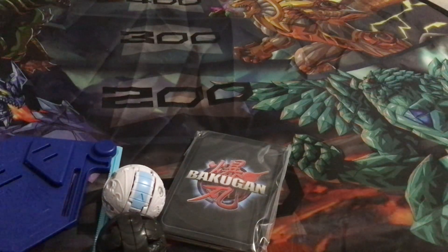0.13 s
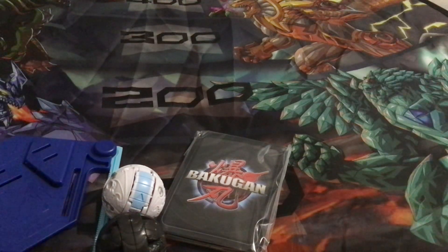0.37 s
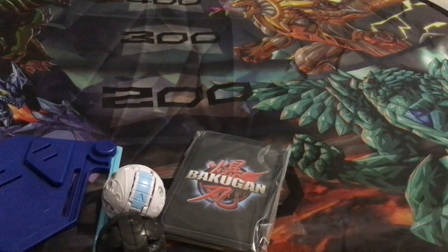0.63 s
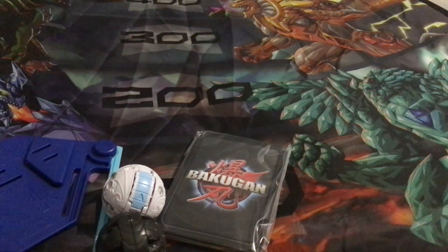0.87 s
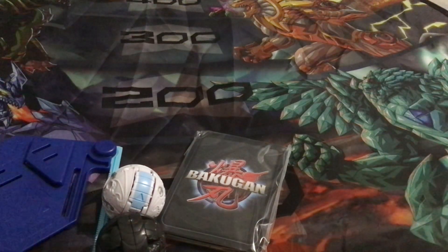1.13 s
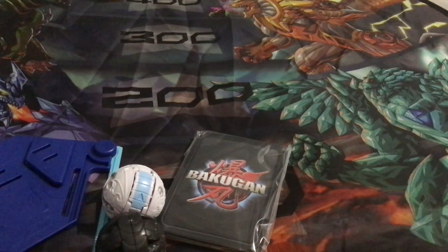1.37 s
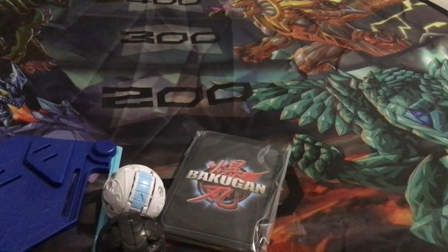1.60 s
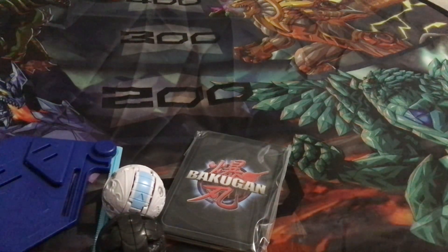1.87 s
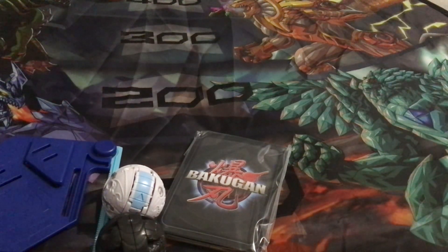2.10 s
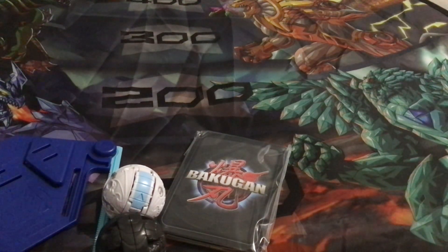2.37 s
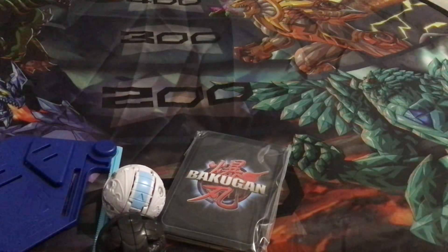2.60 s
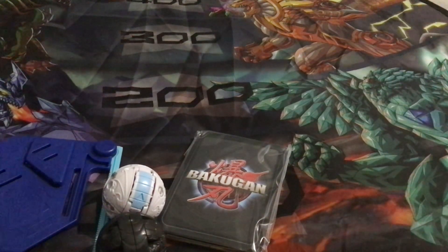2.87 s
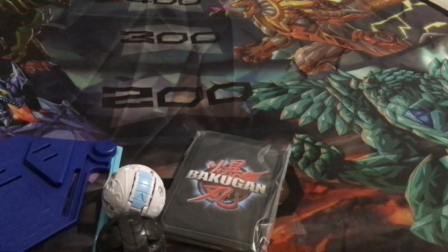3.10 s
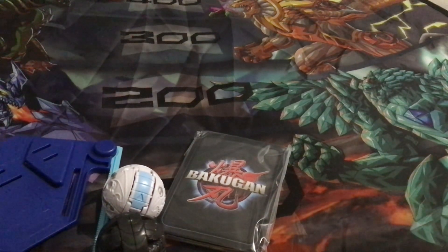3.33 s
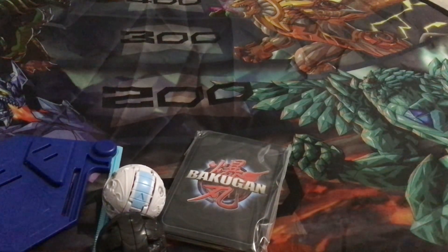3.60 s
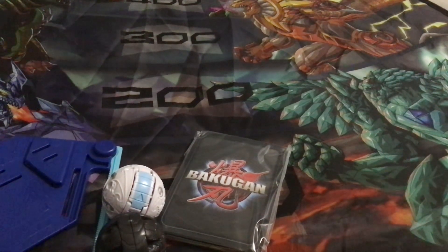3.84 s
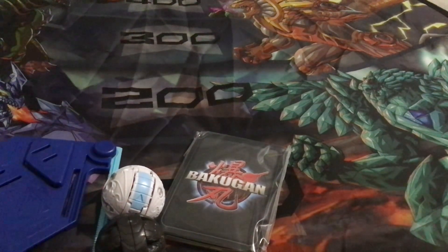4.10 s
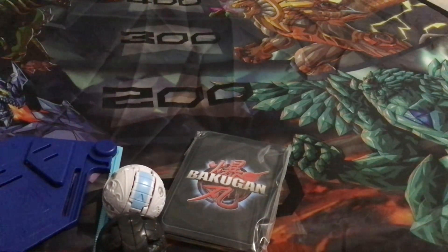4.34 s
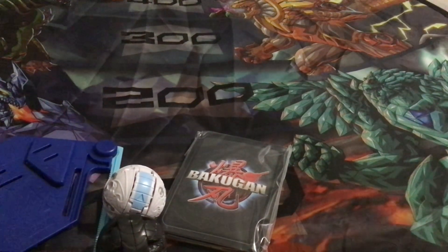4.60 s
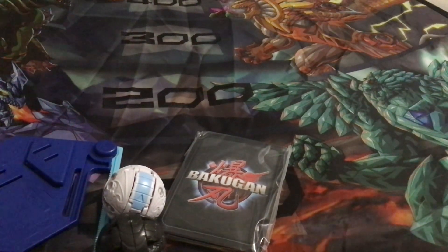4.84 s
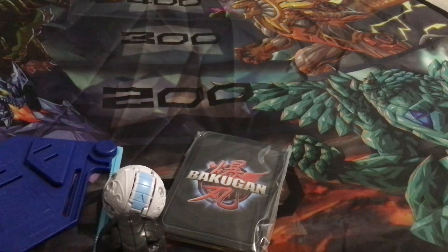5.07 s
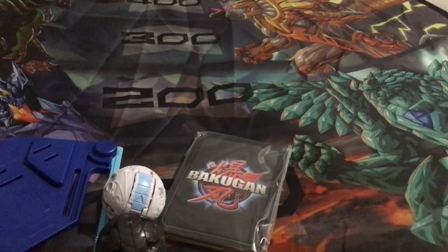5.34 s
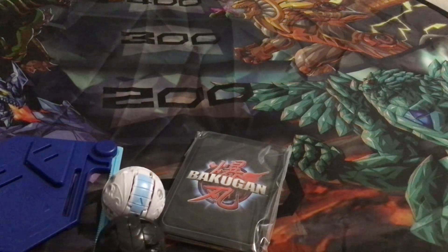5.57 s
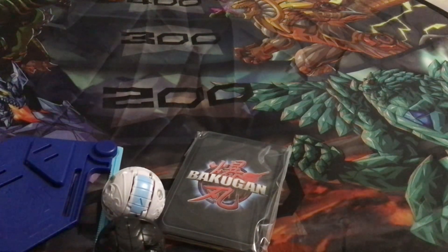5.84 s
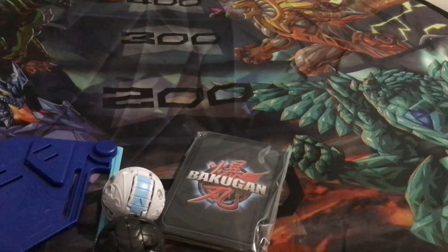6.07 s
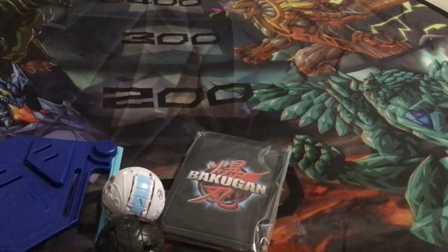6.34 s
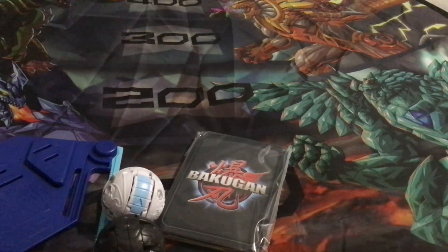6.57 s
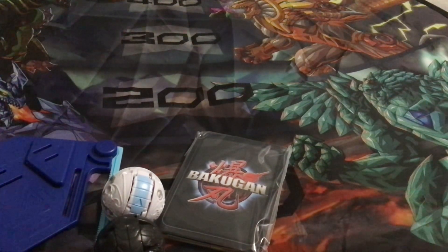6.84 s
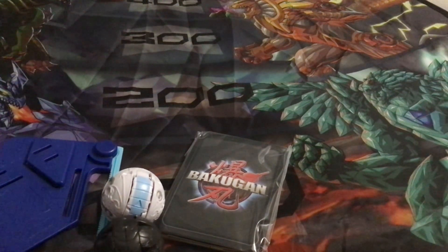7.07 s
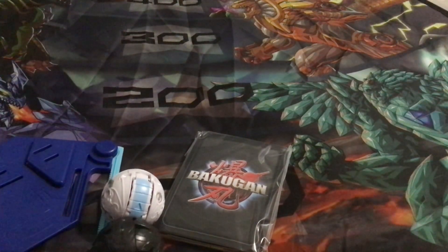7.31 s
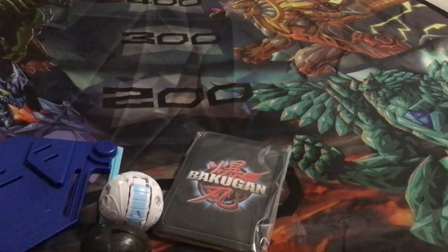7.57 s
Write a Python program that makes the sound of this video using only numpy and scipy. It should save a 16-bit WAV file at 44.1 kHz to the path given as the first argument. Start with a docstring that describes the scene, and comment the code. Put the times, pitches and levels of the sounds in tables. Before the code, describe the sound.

Small hard plastic pieces click, clack and knock on a table close by, with brief rubs and creaks over faint room hum.

```python
"""Small hard plastic pieces are turned over and set down on a table close to a microphone in a quiet room.
Each contact is a noise-burst crack, a short ring of the shells and a knock in the table top, from decaying modes.
Between contacts, trains of small slips rub, shuffle and creak; a thin faint tone swells once.
Sparse echoes give a short room tail, over coloured noise for the room air."""
import sys
import numpy as np
from scipy import signal
from scipy.io import wavfile
from scipy.ndimage import uniform_filter1d

SR = 44100
rng = np.random.default_rng(int(sys.argv[2]) if len(sys.argv) > 2 else 0)


def dump_mix(stems):
    """Bounce the given channels to the path in sys.argv[1] as a 16-bit WAV at rate SR."""
    frames = np.atleast_2d(stems).T  # one column per channel
    limited = np.clip(frames, -1, 1)  # hard clip at full scale
    pcm = np.round(limited * 32767).astype(np.int16)
    wavfile.write(sys.argv[1], SR, pcm)


def to_linear_factor(level_db):
    """Convert decibel levels (scalar or array-like) to linear amplitude factors."""
    exponent = np.asarray(level_db, float) / 20
    return 10 ** exponent


N = 339129

# modes of table top, hollow parts and plastic shells: pitch_hz, level_db, t60_s
MODES = [(88.5, -9, 0.047), (144.2, -10, 0.056), (179.3, -7, 0.1), (259.7, -4, 0.072), (340, -5.5, .06),
         (455, -5, 0.038), (555, -3, 0.05), (619.3, -4.5, 0.098), (853, -8.5, 0.041), (978, -6.5, 0.027),
         (1100, -6, 0.029), (1214, -10.5, 0.021), (1498, -7.5, 0.018), (1707, -4, 0.011),
         (2160, -8.5, 0.011), (2600, -5, 0.018), (2746, -6.5, 0.019), (3100, -5, 0.016),
         (3610, -8.5, 0.019), (4300, -9.5, 0.013)]
# hands at work, interpolated: time_s, pressure_db, dry_db (dry scrape re pressure)
HANDS = [(0.0, -59, -19.5), (0.3, -68, -8.5), (0.92, -59, -12), (1.07, -57, -12), (1.22, -62, -7),
         (1.6, -61.5, -26), (1.82, -60, -10), (2.08, -59, -26), (2.3, -58, -6.5), (2.6, -67.5, -10),
         (2.98, -55, -13), (3.19, -62, -19), (3.4, -76, 8), (3.57, -63.5, 1), (3.79, -64, -6.5),
         (3.96, -79.5, -5), (4.25, -65, -15.5), (5.1, -69, -19), (5.3, -78.5, -5.5), (5.68, -72.5, -7),
         (5.97, -66.5, -14), (6.38, -84, -1.5), (6.64, -66.5, -21), (6.9, -61.5, -22), (7.13, -67.5, -17),
         (7.5, -67, -17), (7.69, -57, -22)]
# spectrum of cracks and fine hiss: pitch_hz, level_db
CRACK_SPECTRUM = [(2500, -20.5), (4000, -2.5), (5000, 5.5), (7000, -2.5), (10000, -6), (12500, -8),
                  (15000, -10.5), (16400, -18), (17000, -49)]


def evened(x):
    """Scales to rms 1."""
    return x / np.sqrt(np.mean(x ** 2) + 1e-20)


def read(points, hz):
    """Reads a table over a log-frequency axis."""
    point_hz, value = np.transpose(points)
    return np.interp(np.log(hz + 1), np.log(point_hz + 1), value)


def coloured(x, spectrum):
    """Minimum-phase filter of unit energy, shaped by a spectrum in dB."""
    half = read(spectrum, np.fft.rfftfreq(2048, 1 / SR)) * np.log(10) / 20
    log_gain = np.r_[half, half[-2:0:-1]]
    taps = np.fft.ifft(np.exp(np.conj(signal.hilbert(log_gain)))).real[:1024]
    return signal.oaconvolve(x, taps / np.linalg.norm(taps))[:len(x)]


def add(mix, start_s, sound):
    """Mixes a sound in at a time."""
    part = mix[max(round(start_s * SR), 0):][:len(sound)]
    part += sound[:len(part)]


def air():
    """Low room hum and microphone hiss: shaped noise, drifting a little in patches of time and frequency."""
    # spectrum: pitch_hz, density_db (per Hz, relative)
    spectrum = [(18, -25), (30, -8.5), (93, 3.5), (314, -4), (480, -9.5), (593, -10), (752, -21.5),
                (1150, -18), (1310, -22.5), (2280, -34), (6050, -31), (9200, -28), (11500, -33.5),
                (14500, -32.5), (16500, -50.5)]
    level_db, drift_db = -69, 0.65
    frames, hz = N // 256 + 5, np.fft.rfftfreq(1024, 1 / SR)
    real, imag, patches = rng.standard_normal((frames, 513, 3)).T
    patches = uniform_filter1d(uniform_filter1d(patches, 12, 0), 14, 1)
    gain_db = read(spectrum, hz)[:, None] + drift_db * evened(patches)
    noise = signal.istft((real + 1j * imag) * to_linear_factor(gain_db), nperseg=1024, noverlap=768)[1][:N]
    return to_linear_factor(level_db) * evened(noise)


def room(x):
    """Sparse taps of random sign, each band dying at its own speed; three tails take turns."""
    # decay by band: pitch_hz, t60_s, energy_db
    decay = np.array([(148.2, 0.38, -8.5), (560, 0.25, -5.5), (1460, .22, -14), (2964, 0.27, -10),
                      (6100, 0.62, -15), (9500, 0.42, -9.5), (14500, 0.31, -7)])
    ripple_db = 3.5  # nearby objects colour each tail unevenly
    turns_hz = 3.1 / 2
    slots = np.arange(130, SR // 2 - 20, 20)
    at = slots + rng.integers(0, 20, (3, len(slots)))
    taps = np.zeros((3, SR // 2))
    np.put_along_axis(taps, at, rng.choice([-1., 1.], at.shape), 1)
    hz, t, z = signal.stft(taps, SR, nperseg=128)
    t60_s = read(decay[:, [0, 1]], hz)[:, None]
    energy_db = read(decay[:, [0, 2]], hz)[:, None]
    energy_db = energy_db + ripple_db * rng.standard_normal((3, len(hz), 1))
    # shorter tails start higher, so that each band carries the energy its dB gives
    fall = to_linear_factor(energy_db - 60 * t / t60_s) / np.sqrt(t60_s * 160)
    tails = signal.istft(z * fall, SR, nperseg=128)[1]
    phase = 2 * np.pi * turns_hz * np.arange(N) / SR + np.pi * np.arange(3)[:, None] / 3
    turns = np.cos(phase) * np.sqrt(2 / 3)  # squares sum to 1
    return signal.fftconvolve(x * turns, tails, axes=1)[:, :N].sum(0)


def whistle():
    """A thin steady sine that swells in and out."""
    # one tone: start_s, end_s, level_db, fade_share (of its length)
    start_s, end_s, level_db, fade_share = (3.23, 3.385, -80.5, .5)
    pitch_hz = 4785
    t = np.arange(start_s, end_s, 1 / SR)
    swell = signal.windows.tukey(len(t), fade_share)
    return start_s, to_linear_factor(level_db) * swell * np.sin(2 * np.pi * pitch_hz * t)


def creaks():
    """A squeezed shell: noise for fast uneven slips, held in its narrow resonances."""
    # squeezes: start_s, end_s, level_db (rms before the swell), size (factor on pitch)
    squeezes = [(2.481, 2.512, -47, .92), (3.186, 3.215, -51, 0.98), (3.841, 3.876, -40.5, .9),
                (7.107, 7.137, -41, 0.991)]
    # shell resonances: pitch_hz, width_hz, level_db
    resonances = [(560, 20, -3.5), (1050, 38, 4), (1530, 36, -38), (1890, 21, -33), (2440, 49, -7.5)]
    settle = 400  # samples for the resonances to build up
    out = np.zeros(N)
    for start_s, end_s, level_db, size in squeezes:
        length = round((end_s - start_s) * SR)
        slips = rng.standard_normal(length + settle)
        shell = np.zeros(length + settle)
        for pitch_hz, width_hz, mode_db in resonances:
            peak = signal.iirpeak(pitch_hz * size, pitch_hz / width_hz, SR)
            shell += to_linear_factor(mode_db) * evened(signal.lfilter(*peak, slips))
        add(out, start_s, to_linear_factor(level_db) * evened(shell[settle:]) * np.hanning(length))
    return out


def table_modes(rise_cycles=.8):
    """Envelope and phase, one row a mode; low modes build up slower as the bending wave spreads."""
    t = np.arange(4000) / SR
    hz, level_db, t60_s = np.transpose(MODES)[:, :, None]
    rise = 1 - np.exp(-t * hz / rise_cycles)
    return to_linear_factor(level_db - 60 * t / t60_s) * rise, 2 * np.pi * hz * t


def grains(per_s, size_db):
    """Dense slips of random sign, some larger, arriving in mild clumps."""
    clump_db = 2.5 * evened(uniform_filter1d(rng.standard_normal(N), 400))
    size = to_linear_factor(size_db * np.minimum(rng.exponential(1, N), 3)) * rng.choice([-1., 1.], N)
    return evened(to_linear_factor(clump_db) * size * (rng.random(N) < per_s / SR))


def shuffle():
    """Slips shake every table mode; finer slips give the dry scrape and hiss of plastic on plastic."""
    # short firm strokes: start_s, end_s, drag_db, scrape_db, hiss_db
    strokes = [(3.739, 3.826, -51.5, -76, -72), (3.831, 3.868, -39, -50, -79),
               (4.005, 4.035, -79.5, -75.5, -62), (4.164, 4.27, -70.5, -80, -85.5),
               (4.983, 5.008, -72.5, -74.5, -87), (5.392, 5.469, -49.5, -59.5, -70.5),
               (5.71, 5.722, -69.5, -76.5, -81.5), (5.771, 5.791, -66, -72, -86),
               (5.853, 5.857, -67.5, -74, -84), (5.91, 5.987, -71.5, -77.5, -90),
               (6.397, 6.415, -74.5, -74, -82), (6.119, 6.201, -56.5, -74.5, -86.5),
               (6.286, 6.31, -52, -64, -75), (6.598, 6.63, -61, -80, -87), (6.68, 6.755, -58, -59.5, -81),
               (6.795, 6.919, -59.5, -63, -75), (6.954, 7.06, -54, -60, -93), (7.108, 7.131, -41, -68, -88),
               (7.478, 7.511, -45.5, -61, -80), (7.546, 7.616, -34.5, -57, -77)]
    # dry scrape spectrum: pitch_hz, level_db
    scrape_spectrum = [(600, -9), (1200, 0.5), (2400, 7.5), (3300, -2.5), (5000, -2), (8000, -13),
                       (12000, -27), (16000, -20)]
    time_s, drag_db, dry_db = np.transpose(HANDS)
    t = np.arange(N) / SR
    drag_force = to_linear_factor(np.interp(t, time_s, drag_db))
    scrape_force = to_linear_factor(np.interp(t, time_s, drag_db + dry_db))
    hiss_force = np.zeros(N)
    for start_s, end_s, *levels_db in strokes:
        press = signal.windows.tukey(round((end_s - start_s) * SR), .5)
        for force, level_db in zip((drag_force, scrape_force, hiss_force), levels_db):
            add(force, start_s, to_linear_factor(level_db) * press)

    envelope, phase = table_modes()
    hz = np.transpose(MODES)[0][:, None]
    rings = envelope * np.sin(phase) * to_linear_factor(-4.0 * np.log2(1 + hz / 700))  # soft slips favour low modes
    slips = drag_force * grains(3000, 2.8)
    mode = rng.integers(0, len(MODES), N)  # each slip shakes one mode
    drag = sum(signal.oaconvolve(slips * (mode == k), ring)[:N] for k, ring in enumerate(rings))
    drag *= np.sqrt(len(MODES)) / np.linalg.norm(rings)
    scrape = coloured(scrape_force * grains(3000, 3.3), scrape_spectrum)
    hiss = coloured(hiss_force * grains(16000, 1.5), CRACK_SPECTRUM)
    return drag + scrape + hiss


def blows():
    """Listed contacts, random faint ticks and soft heavy thuds: start_s, then dB of clack, thump, knock, snap, edge."""
    # contacts: start_s, level_db, then re level: weight_db (into the table, before its split), snap_db, edge_db
    listed = [(0.067, -34, -17.5, 0, -16), (0.197, -49, -10, -9, -18), (0.251, -48, 1.5, -11, -14.5),
              (0.344, -38, -11, -14.5, -18), (0.384, -58, -2, -2, -13), (0.398, -42.5, -13, -3.5, -10),
              (0.477, -27.5, -4.5, -11, -22.5), (0.516, -49, 11.5, -4, -8), (0.573, -53.5, 9, -9, -31),
              (0.632, -42, -9, -6, -26), (0.655, -36.5, -12, 2, -15), (0.89, -17, -12, 6, -9),
              (0.981, -22.5, -11, -8, -18.5), (1.07, -35, -9.5, -17, -29), (1.09, -38, -22, -3, -23),
              (1.118, -41, -17, -11, -34), (1.158, -52.5, -15, -1, -18), (1.204, -40, -16, -12, -30),
              (1.242, -50.5, -6, -6, -18), (1.38, -43, -19, -9.5, -20), (1.428, -46.5, -9, -21, -26),
              (1.477, -11, -15, -10, -17.5), (1.714, -52, -22, 3.5, -19), (1.744, -42, -19, -5.5, -20),
              (1.767, -47, -5, -19, -37), (1.862, -46.5, 1.5, -1, -11), (1.956, -51, -1, -16, -25),
              (1.985, -50.5, 4, -1.5, -15), (2.039, -42, -2, -10, -19), (2.056, -45.5, -16, -10, -19),
              (2.095, -48, -2, -7, -14.5), (2.149, -44.5, -7, -12, -26), (2.21, -38.5, 0.5, 7, -7),
              (2.299, -46, -30, 2.5, -7), (2.334, -54.5, -11, 6, 11.5), (2.441, -37.5, -12, -22, -19),
              (2.468, -44, -2, -11, -17), (2.491, -45, -4.5, -5, -5), (2.591, -39.5, -1, -12.5, -12),
              (2.716, -23.5, -6, -6.5, -18), (2.81, -43, -7, -3, -0.5), (2.837, -48, -9, 4, 1.5),
              (2.862, -45.5, -5, -3, -15), (2.909, -52, -15, -5, 7), (2.969, -22, -17.5, -15, -17),
              (3.06, -43.5, -20, -6, -15), (3.065, -50.5, -4, -2, 3.5), (3.102, -44, 3, -11, -15),
              (3.153, -46, 4, -13, -22), (3.191, -42.5, 4.5, -23, -34), (3.401, -2, -20, -12.5, -17),
              (3.49, -37, -4.5, -19, -4.5), (3.564, -51, -4, 0, 0), (3.64, -34.5, -23, -2, -14),
              (3.741, -43.5, -11, -15, -17), (3.786, -40, 5, -27, -32), (3.842, -25, -10, -11, -22.5),
              (4.008, -65, -3.5, 9, 4), (4.203, -51, -7, -13.5, -21.5), (4.768, -36.5, -0.5, 2, -8),
              (5.023, -53.5, -2.5, -10, -25), (5.045, -48.5, -4.5, -9.5, -31), (5.1, -50, -6.5, -7, -25.5),
              (5.129, -49, -8, -5, -31), (5.177, -46.5, -9.5, -9, -40), (5.218, -48.5, -7.5, -5.5, -33),
              (5.246, -48, -6.5, -7.5, -29), (5.403, -40.5, -4, -8, -17), (5.424, -24.5, -7.5, -9.5, -15),
              (5.455, -26.5, -11.5, -8, -17), (5.516, -40.5, -24.5, -3.5, -17), (6.159, -53, -4.5, -7, -17),
              (6.214, -49.5, -5, -9.5, -27), (6.27, -50.5, -0.5, -10, -14),
              (6.294, -34.5, -8.5, -16.5, -27.5), (6.655, -42, -3, -9, -19), (6.671, -48, 1, -8, -18),
              (6.684, -43.5, 1, -1, -11), (6.695, -42, -8, -13, -24), (6.723, -42, -1, -16, -19),
              (6.794, -41, -19, -9, -25), (6.822, -45.5, 1, -6, -15), (6.858, -45.5, 7, -16, -25),
              (6.877, -46, -11, -14, -24), (6.945, -43, -19, 0.5, -24), (6.975, -43.5, -5, -4, -20),
              (6.988, -46, -2, -9, -12), (7.028, -44, -3, -8, -13.5), (7.076, -42.5, -8, -3, -16),
              (7.186, -41.5, 0, -25, -36), (7.211, -66.5, 15, 8, -8), (7.238, -25.5, -4.5, -9.5, -16),
              (7.471, -38.5, 0, -7.5, -8), (7.49, -40.5, 1, -16, -22), (7.506, -33.5, -5.5, -17, -23),
              (7.526, -33.5, 0, -3.5, -9), (7.559, -23, -8, -5.5, -15.5), (7.571, -23, -7, -6, -14.5),
              (7.586, -26, -5, 1, -15), (3.378, -44, -15, -11, -29.5), (4.911, -57.5, -5, -15, -25),
              (4.94, -57.5, 0.5, -12, -27)]
    # soft heavy weights landing on the table: start_s, level_db
    thuds = [(0.573, -49), (1.485, -32.5), (2.04, -45), (3.785, -45), (4.77, -43), (5.43, -35), (6.86, -36),
             (7.575, -28.5), (7.591, -27)]
    tick_count, tick_spread_db = 30, 5.5
    tick_db = np.array([6, -5, -12.5, -20.5])  # level re hand pressure; weight, snap, edge re level
    time_s, pressure_db, _ = np.transpose(HANDS)
    t = np.linspace(0, (N - 1) / SR, 800)
    # ticks come more often while the hands are busy
    busy = np.cumsum(to_linear_factor(np.interp(t, time_s, pressure_db)))
    tick_s = np.interp(rng.random(tick_count) * busy[-1], busy, t)
    ticks = np.c_[tick_s, tick_db + tick_spread_db * rng.standard_normal((tick_count, 4))]
    ticks[:, 1] += np.interp(tick_s, time_s, pressure_db)

    start_s, level_db, weight_db, snap_db, edge_db = np.r_[listed, ticks].T
    thump_db = -2.5 + 0.87 * weight_db  # low modes
    knock_db = 0.64 * weight_db  # middle modes
    lift_db = 60  # all but a thud's low modes lie this far down
    thud_rows = [(when_s, thud_db - lift_db, lift_db, 0, 0, 0) for when_s, thud_db in thuds]
    return np.r_[np.c_[start_s, level_db, thump_db, knock_db, snap_db, edge_db], thud_rows]


def radiated(struck):
    """Summed over all directions a contact is a plain click, without the sharp peaks heard at one spot."""
    # bands of clack, thump, knock, snap, edge: low_hz, high_hz
    bands = [(1000, 2200), (90, 380), (420, 800), (2200, 4500), (4500, 16000)]
    start_s, level_db, *rel_db = struck.T
    at = np.round(start_s * SR).astype(int)
    out = np.zeros(N)
    for band, band_db in zip(bands, [0 * level_db] + rel_db):
        sos = signal.butter(2, band, "bandpass", fs=SR, output="sos")
        click = signal.sosfilt(sos, signal.unit_impulse(2048))
        train = np.bincount(at, to_linear_factor(level_db + band_db), N)
        out += signal.oaconvolve(train, click / abs(click).max())[:N]
    return out


def contacts(struck):
    """Each contact meets the modes unevenly, a little detuned by where it lands, cracks, and chatters as it settles."""
    # limits between thump, knock, clack and snap modes: edge_hz
    range_edges = [400, 700, 2200]
    crack_peak_ms, chatter_db, chatter_decay_ms = 0.59, -13.5, 15.0
    spread_db, detune, rebound, harden = 1.5, .04, .07, 0.45
    envelope, phase = table_modes()
    hz = np.transpose(MODES)[0]
    group = np.searchsorted(range_edges, hz)
    slope_octaves = np.log2(hz / 1400) * (group == 2)
    ms = np.arange(1200) / SR * 1000
    spike = ms / crack_peak_ms * np.exp(1 - ms / crack_peak_ms)
    settle = to_linear_factor(chatter_db) * np.exp(-ms / chatter_decay_ms)
    cracks, tones = np.zeros((2, N))
    for start_s, level_db, thump_db, knock_db, snap_db, edge_db in struck:
        add(cracks, start_s, to_linear_factor(level_db + edge_db) * rng.standard_normal(1200) * (spike + settle))
        uneven, pitch, offset = rng.standard_normal((3, len(MODES), 1))
        drive_db = level_db + np.array([thump_db, knock_db, 0, snap_db])[group]
        drive_db += harden * max(level_db + 29.5, 0) * slope_octaves  # harder blows tilt the clack upwards
        gain = to_linear_factor(drive_db[:, None] + spread_db * uneven)
        ring = (gain * envelope * np.sin(phase * (1 + detune * pitch) + 2 * offset)).sum(0)
        bounces = np.r_[1, rebound * settle * rng.standard_normal(1200)]
        add(tones, start_s, signal.fftconvolve(ring, bounces))
    return tones + coloured(cracks, CRACK_SPECTRUM)


def scene():
    """The hands' work, its echo and the room air."""
    struck = blows()
    hits = contacts(struck)
    rubs = shuffle() + creaks()
    add(rubs, *whistle())
    echo = room(rubs + to_linear_factor(5.0) * radiated(struck))
    return (hits + rubs + echo + air())[None]


def roll_off(x):
    """The treble ends steeply here."""
    return signal.sosfilt(signal.butter(12, 16660, fs=SR, output="sos"), x)


def record(dry):
    """The microphone cuts the deepest bass steeply; the input stage rounds off the highest peak."""
    ceiling, knee = .93, 6
    cut = signal.sosfilt(signal.butter(4, 55, "highpass", fs=SR, output="sos"), dry)
    mix = cut / (1 + abs(cut / ceiling) ** knee) ** (1 / knee)
    return roll_off(mix)


dry = scene()
out = record(dry)
dump_mix(out)
```